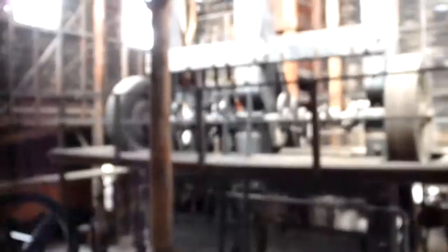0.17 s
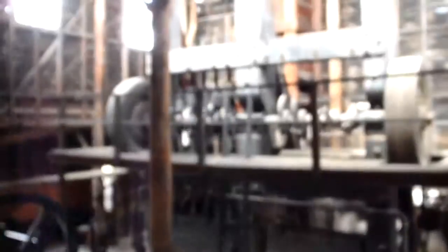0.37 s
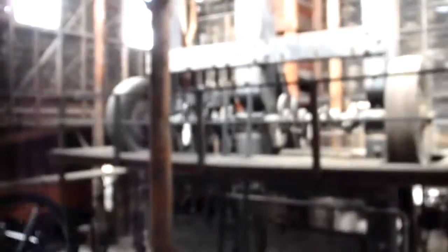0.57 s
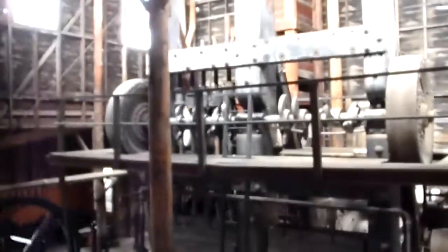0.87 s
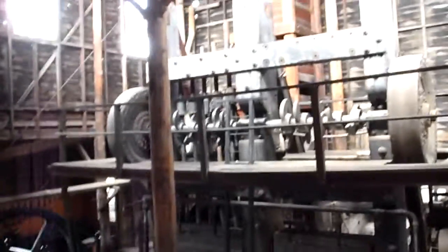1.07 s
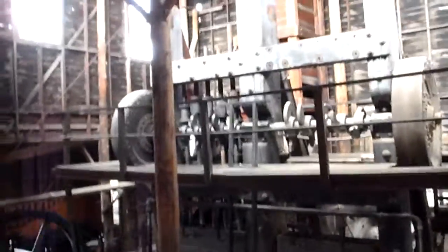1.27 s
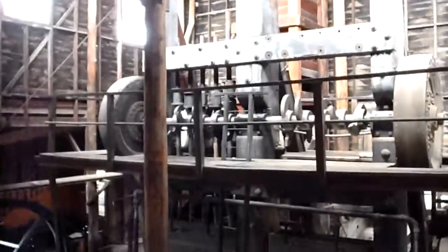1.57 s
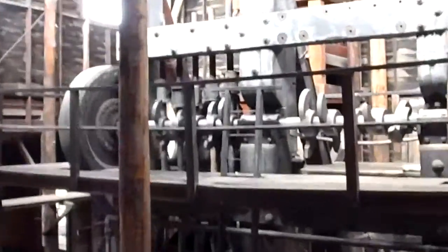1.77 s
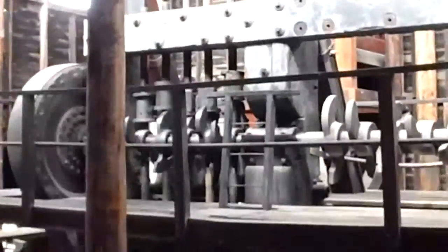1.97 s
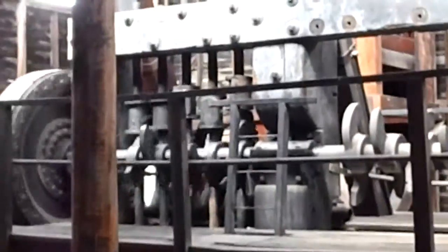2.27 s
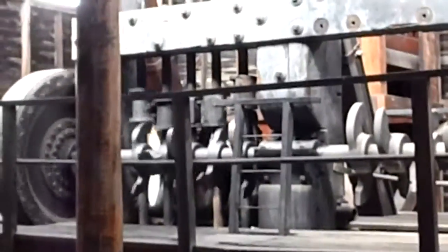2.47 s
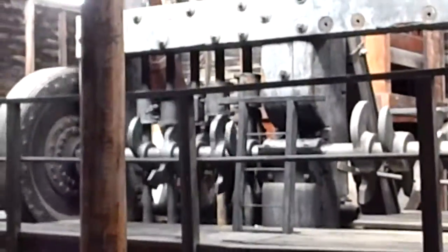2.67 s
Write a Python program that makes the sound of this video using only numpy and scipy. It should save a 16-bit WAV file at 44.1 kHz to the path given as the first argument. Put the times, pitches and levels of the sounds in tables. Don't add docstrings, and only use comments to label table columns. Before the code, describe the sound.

After a blink of silence, heavy stamping machinery crunches ore in uneven blows, cams clank and bearings squeak over belt and gear rumble; short bright shed echo, small microphone with little bass and dull, patchy treble.

```python
import sys
import numpy as np
from scipy import signal
from scipy.fft import rfft, irfft
from scipy.io import wavfile
from scipy.ndimage import uniform_filter1d

SR = 44100
rng = np.random.default_rng(int(sys.argv[2]) if len(sys.argv) > 2 else 0)


def store_pcm(level_fs):
    pcm = np.round(np.clip(level_fs, -1, 1) * 32767).astype(np.int16)
    wavfile.write(sys.argv[1], SR, np.atleast_2d(pcm).T)


def boost_factor(decibels):
    exponent = np.asarray(decibels, float) / 20
    return 10 ** exponent


N = 124362


def curve(table, hz):
    table = np.array(table, float)
    return np.interp(np.log(np.maximum(hz, 1)), np.log(table[:, 0]), table[:, 1])


def colour(x, db):
    half = len(x) // 2
    cepstrum = irfft(db * np.log(10) / 20, len(x))
    cepstrum[1:half] *= 2
    cepstrum[half + 1:] = 0
    return irfft(rfft(x) * np.exp(rfft(cepstrum)), len(x))


def walk(rate):
    k = int(SR / rate)
    steps = np.repeat(rng.standard_normal(N // k + 1), k)
    return 1.29 * uniform_filter1d(uniform_filter1d(steps, k), k)[:N]


def swell(t, start, length):
    return np.sin(np.pi * np.clip((t - start) / length, 0, 1)).clip(0)


# [f/Hz, level/dB, t60/s]
IRON_MODES = [(175.6, -6, 0.57), (329.5, -8, 0.13), (544.5, -2.5, 0.14), (648, -7.5, 0.073),
              (1014.7, -5.5, 0.34), (1260, -21, 0.65), (1436, -14, 0.32), (1643, 0, 0.31),
              (2104, -9, 0.066), (4100, -9.5, 0.023), (4450, -13, 0.041), (4880, -8.5, 0.087),
              (5200, -14, 0.058), (6300, -14, 0.15)]
# [f/Hz, density/dB per Hz]
CRUNCH_SPECTRUM = [(20, -2.5), (100, -16.5), (167, -3.5), (600, -4), (1270, 0.5), (2880, -13.5),
                   (5270, -13.5), (14000, -13)]


def iron_ring(hz):
    scatter_db, t60_scale = 4, 0.37
    modes = 0
    for f, mode_db, t60 in IRON_MODES:
        detune, uneven = rng.standard_normal(2)
        f = f * (1 + 0.0038 * detune)
        half = np.log(1000) / (2 * np.pi * t60 * t60_scale)
        modes = modes + boost_factor(mode_db + scatter_db * uneven) * half / (half + 1j * (hz - f))
    return modes


def crunches(rows, gain_db, attack, release, crack_db, size=16384):
    bass_hz, treble_hz, grain_spread_db = 660, 3000, 2
    iron_db, crack_s, crack_hz = -10.5, .012, 2200
    out = np.zeros(N + size)
    t = np.arange(size) / SR
    hz = np.arange(size // 2 + 1) * SR / size
    base = curve(CRUNCH_SPECTRUM, hz)
    norm = np.sqrt(np.mean(boost_factor(2 * base)))
    low = 1 / (1 + (hz / bass_hz) ** 4)
    high = 1 / (1 + (treble_hz / (hz + 1)) ** 4)
    crack_band = 1 + 1j * (hz / crack_hz - crack_hz / (hz + 1)) * 1.6
    for s, db, hold, bass_db, treble_db in rows:
        grain_size = np.repeat(np.minimum(rng.exponential(size=size // 32), 3.0), 32)
        grains = rng.standard_normal(size) * boost_factor(grain_spread_db * grain_size)
        env = np.clip(t / attack, 0, 1) ** 2 * np.exp(-np.maximum(t - attack - hold, 0) / release)
        grains = grains * np.sqrt(np.sum(env ** 2) / np.sum((grains * env) ** 2))
        push = colour(grains * env, bass_db * low + treble_db * high)
        direct = colour(push, base) / norm
        ring = boost_factor(iron_db + 19) * irfft(rfft(push) * iron_ring(hz), size)
        first = push * np.exp(-np.maximum(t - attack, 0) / crack_s)
        crack = boost_factor(crack_db) * irfft(rfft(first) / crack_band, size)
        i = max(int((s - attack) * SR), 0)
        out[i:i + size] += boost_factor(db + gain_db) * (direct + ring + crack)
    return out[:N]


# [t/s, level/dB, crunch length/s, bass/dB, treble/dB]
STAMP_BLOWS = [(0.126, -16, 0.037, -8, -1.5), (0.314, -13, 0.016, -10.5, -5),
               (0.444, -15.5, 0.018, -2, -3.5), (0.733, -13, 0.03, -3, -2), (0.931, -17.5, 0.043, -5.5, -1),
               (1.108, -17, 0.028, -2, 0.5), (1.252, -23, 0.029, 1, 0), (1.507, -8, 0.017, -1, 0),
               (1.734, -13, 0.024, -6, -0.5), (1.925, -17.5, 0.033, 2, 0), (2.063, -15, 0.029, 1, -1.5),
               (2.35, -14, 0.025, -5.5, 0.5), (2.55, -21, 0.034, -8.5, -2), (2.731, -19, 0.016, -3.5, -4)]


def blows(k):
    return crunches(STAMP_BLOWS[k::3], -5.5, attack=.006, release=0.018, crack_db=-1)


# [t/s, level/dB, length/s, bass/dB, treble/dB]
SLIDES = [(.04, -27.5, 0.059, -0.5, 3), (.17, -24, 0.09, 0, -2), (.333, -27, 0.015, 1.5, 6),
          (.37, -27, 0.05, 3.5, 7), (.48, -28, 0.096, 3.5, 0), (.79, -23, 0.016, 2, 7.5),
          (.98, -26.5, 0.097, 2.5, -1.5), (1.17, -30.5, 0.054, -5, 5), (1.28, -24, 0.029, -1.5, -13),
          (1.44, -32.5, 0.022, 6, -5), (1.47, -29.5, 0.033, 4.5, 3.5), (1.56, -20, 0.04, 0, 4.5),
          (1.645, -21.5, 0.031, 2.5, -4.5), (1.78, -22, 0.024, -6, -5), (.6, -34.5, 0.096, 1, -0.5),
          (.85, -28.5, 0.093, -7.5, -0.5), (1.84, -27, 0.059, -1.5, -5.5), (1.97, -22, 0.069, 1.5, 3.5),
          (2.1, -19, 0.048, 1.5, -3), (2.2, -29.5, 0.089, 10.5, 5.5), (2.245, -21, 0.027, -0.5, -11),
          (2.375, -25.5, 0.033, 1.5, 7), (2.465, -31.5, 0.022, -3, -13), (2.575, -28.5, 0.016, 1, -15),
          (2.76, -23.5, 0.087, -0.5, 4.5)]


def rattles(k):
    return crunches(SLIDES[k::3], -3.5, attack=.014, release=0.03, crack_db=-39)


# [t/s, peak/dB, f/Hz]
HARD_KNOCKS = [(0.086, -19, 743), (0.126, -17, 2180), (0.131, -18, 2170), (0.182, -12, 1190),
               (0.316, -16, 1110), (0.445, -11, 1190), (0.735, -14, 1150), (0.901, -29, 1120),
               (0.931, -16, 1620), (1.11, -21, 2040), (1.115, -23, 1440), (1.25, -17, 1040),
               (1.433, -34, 660), (1.449, -27, 689), (1.461, -24, 659), (1.507, -12, 1030),
               (1.735, -7, 2070), (1.839, -24, 1170), (1.928, -14, 1100), (2.064, -17, 894),
               (2.064, -13, 1670), (2.269, -16, 1320), (2.351, -12, 1040), (2.376, -19, 1240),
               (2.551, -20, 1620), (2.732, -14, 2040), (2.735, -22, 1450),
               (0.321, -19, 1550), (0.33, -17, 1070), (0.339, -14, 564), (0.458, -13, 1540),
                  (0.735, -12.5, 584), (0.744, -13, 1150), (1.507, -8, 610), (1.518, -8, 2010),
                  (1.526, -10, 799), (1.533, -11, 1060), (1.603, -14, 640), (1.661, -14, 546),
                  (1.749, -13, 1690), (2.078, -11, 581), (2.351, -11, 1030), (2.387, -10, 1240)]


def knocks(t):
    gain_db, decay_cycles = -3.5, 2
    contacts = HARD_KNOCKS
    sides = np.sign(rng.standard_normal(len(contacts)))
    out = 0
    for (s, db, hz), side in zip(contacts, sides):
        cycles = np.maximum(t - s, 0) * hz
        out = out + side * boost_factor(db + gain_db) * np.exp(-cycles / decay_cycles) * np.sin(2 * np.pi * cycles)
    return out


# [t/s, f/Hz, level/dB, t60/s]
CAM_CLANKS = [(.13, 2100, -26, 0.32), (.315, 1100, -23, 0.11), (.335, 570, -26.5, 0.23),
              (.457, 2530, -30, .2), (.445, 1250, -27.5, .2), (.733, 2900, -31, 0.065),
              (.74, 1100, -26, .15), (.935, 1620, -24.5, .3), (1.112, 1300, -30, .12),
              (1.51, 1100, -27, .1), (1.515, 565, -25.5, .25), (1.508, 1900, -25, .06),
              (2, 2065, -25, 0.13), (1.5, 8300, -40, .08), (1.935, 1415, -25, .2),
              (2.075, 2512, -24.5, 0.13), (2.062, 1670, -24, .25), (2.065, 600, -26, .3),
              (2.125, 1690, -26.5, .2), (1.11, 2050, -27.5, .1), (2.37, 1244, -23, .2),
              (2.36, 1610, -25.5, .25), (2.35, 5200, -34, .08), (2.555, 1658, -32, 0.19)]


def clanks(t):
    gain_db, roughness, t60_scale, rise_s = -2.5, 1.43, 0.97, 0.0011
    out = 0
    for s, hz, db, t60 in CAM_CLANKS:
        u = np.maximum(t - s, 0)
        chatter = 1 + roughness * (walk(110) + 1j * walk(110))
        note = np.imag(chatter * np.exp(2j * np.pi * hz * u))
        decay = boost_factor(gain_db + db - 60 * u / (t60 * t60_scale))
        out = out + decay * np.minimum(u / rise_s, 1) * note
    return out


# [t/s, length/s, f/Hz, level/dB]
SINGING = [(0.43, .2, 4905, -50), (.743, .052, 5394, -26.5), (.795, 0.068, 4903, -30),
           (.87, .06, 5300, -37), (.97, 0.051, 4200, -37), (1.414, .1, 4900, -42), (1.565, .045, 6150, -29),
           (1.61, .06, 6100, -39), (1.68, 0.056, 4300, -40), (1.8, 0.055, 4800, -37),
           (2.01, .09, 4300, -40), (2.13, .05, 4400, -38), (2.22, .095, 4900, -39),
           (2.095, 0.056, 1322, -24), (2.175, 0.057, 1325, -27.5), (2.4, 0.057, 6145, -30.5),
           (2.365, .04, 6290, -32), (2.36, 0.069, 6591, -37), (.49, 0.088, 1660, -34.5)]


def squeal(t):
    shaft_hz, wobble, edge = 4903, 0.00102, 0.49
    flicker = boost_factor(1.6 * walk(38.2))
    clock = np.cumsum(1 + wobble * walk(29.5)) / SR
    out = boost_factor(-58) * np.sin(2 * np.pi * shaft_hz * clock)
    for s, length, hz, db in SINGING:
        out = out + boost_factor(db) * swell(t, s, length) ** edge * np.sin(2 * np.pi * hz * clock)
    return flicker * out


def floor_bump(t):
    u = t - 1.167
    return boost_factor(-24) * np.exp(-(u / 0.0064) ** 2) * np.sin(2 * np.pi * 55 * u)


# [f/Hz, t60/s]
SHED_DECAY = [(125, 0.39), (500, 0.56), (2000, 0.38), (5000, 0.53), (12000, 0.57)]


def shed(extra_db, size=32768):
    level_db, rise_s = -3, 0.02
    t = np.arange(size) / SR
    tail = 0
    for hz in 90 * 2. ** np.arange(0, 7.6, .5):
        sos = signal.butter(2, [hz / 1.19, hz * 1.19], "band", fs=SR, output="sos")
        band = signal.sosfilt(sos, rng.standard_normal(size))
        tail = tail + band * boost_factor(-60 * t / curve(SHED_DECAY, hz))
    tail = tail * (1 - np.exp(-t / rise_s))
    return boost_factor(level_db + extra_db) * tail / np.sqrt(np.sum(tail ** 2)) + (t == 0)


# [f/Hz, density/dB per Hz]
RUMBLE_SPECTRUM = [(20, -13), (110, -15.5), (174, -5), (786, -10), (1300, -13), (2780, -21.5),
                   (5270, -22.5), (14000, -12.5)]


def rumble():
    n = N + N % 2
    grains = rng.standard_normal(n) * boost_factor(1.5 * np.minimum(rng.exponential(size=n), 3.0))
    x = colour(grains, curve(RUMBLE_SPECTRUM, np.arange(n // 2 + 1) * SR / n))[:N]
    return x / np.sqrt(np.mean(x ** 2)) * boost_factor(-35.5 + 0.96 * walk(10.4))


def scene():
    t = np.arange(N) / SR
    mill = signal.fftconvolve(clanks(t), shed(-3.5))[:N]
    for k in range(3):
        mill = mill + signal.fftconvolve(blows(k) + rattles(k), shed(0))[:N]
    return (mill + knocks(t) + squeal(t) + floor_bump(t) + rumble())[None]


# [t/s, length/s, depth/dB]
GAIN_SAGS = [
    (1.536, 0.034, -2.5),
    (2.295, 0.055, -6),
]


def gain_control(t):
    return boost_factor(sum(db * np.sqrt(swell(t, s, length)) for s, length, db in GAIN_SAGS))


# [f/Hz, gain/dB]
MIC_RESPONSE = [(20, -29), (100, -16.5), (150, -3.5), (6000, -3), (7500, -18), (9500, -25.5), (11500, -28),
                (14000, -30.5)]


def microphone(x):
    ceiling = 0.5
    x = colour(x, curve(MIC_RESPONSE, np.arange(len(x) // 2 + 1) * SR / len(x)))
    return ceiling * np.tanh(x / ceiling)


# [f/Hz, threshold/dB under the local level]
TREBLE_GATE = [(6000, -30), (7500, -6), (9000, -1), (11500, -1.5), (13000, -.5), (14200, 0)]


def patchy_treble(x):
    top_hz, wander_hz = 14180, 120
    hz, _, z = signal.stft(x, SR, "cosine", nperseg=2048)
    group = uniform_filter1d(uniform_filter1d(np.abs(z) ** 2, size=8, axis=0), size=2, axis=1)
    local = uniform_filter1d(group, size=80, axis=0)
    strong = group > local * boost_factor(2 * curve(TREBLE_GATE, hz))[:, None]
    below_top = hz[:, None] < top_hz + wander_hz * rng.standard_normal(z.shape[1])
    return signal.istft(z * (strong & below_top), SR, "cosine", nperseg=2048)[1][:N]


def low_pass(x):
    return signal.sosfilt(signal.butter(12, 14720, fs=SR, output="sos"), x)


def record(dry):
    start_s, fade_s = 0.071, 0.0018
    t = np.arange(N) / SR
    x = dry[0] * gain_control(t) * np.clip((t - start_s) / fade_s, 0, 1)
    x = microphone(np.pad(x, (0, 4096 + N % 2)))
    mix = patchy_treble(x) * (t > start_s)
    return low_pass(mix[None])


dry = scene()
out = record(dry)
store_pcm(out)
```